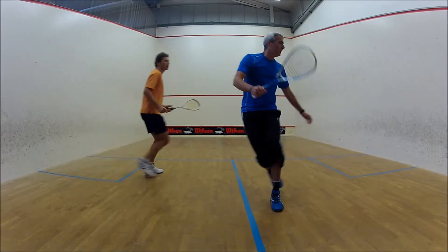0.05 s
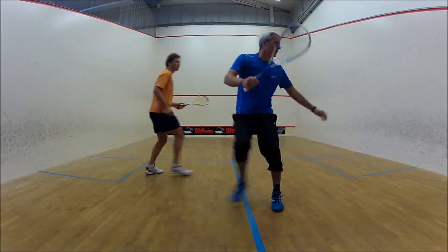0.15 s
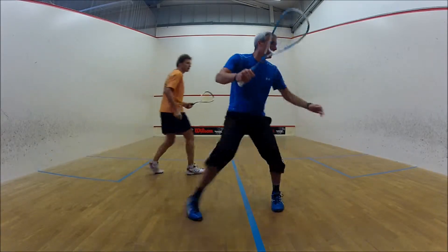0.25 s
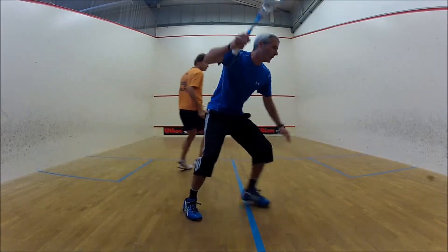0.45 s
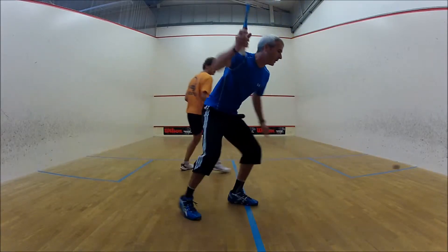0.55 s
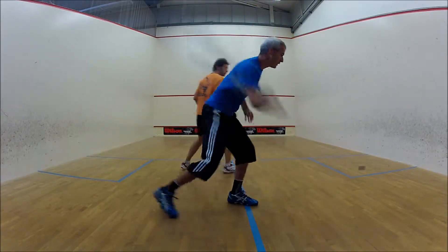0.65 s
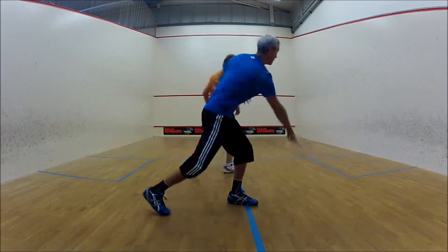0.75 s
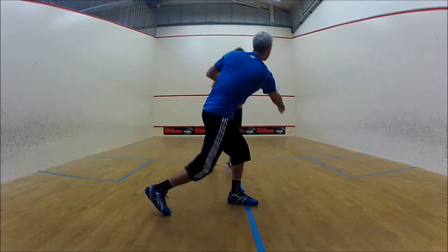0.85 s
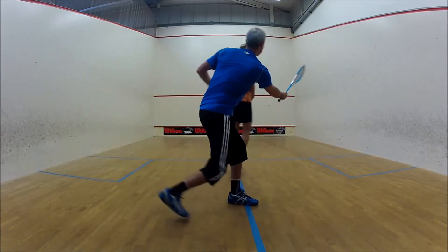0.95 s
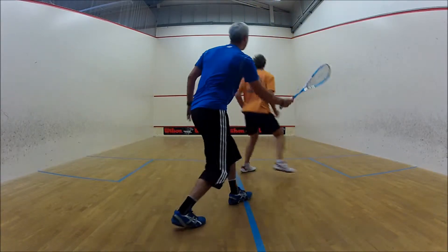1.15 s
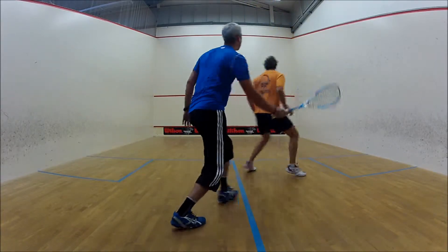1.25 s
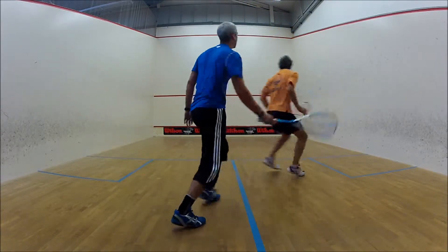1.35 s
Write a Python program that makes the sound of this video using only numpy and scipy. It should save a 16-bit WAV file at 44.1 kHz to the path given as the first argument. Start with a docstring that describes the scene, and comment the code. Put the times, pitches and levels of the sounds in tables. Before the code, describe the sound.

A squash ball slams a glass wall close by at about 0.2 seconds; the pane booms and its fittings rattle until around 0.6. Shoes thud on the wooden floor and squeak briefly near 0.8. At 1.0 a racket cracks the ball, which strikes the far wall, followed by two soft footfalls. The court echoes strongly over a faint hum, and the sound has a slight glassy fizz.

```python
"""A squash rally in an echoing court, heard from the glass back wall.
Over a fading echo and hall hum, shoes scuff, squeak and thud on sprung wood. The ball slams the glass,
which booms and rattles in its fittings; a racket then cracks the ball to the front wall.
A slow converter holds each sample, which adds a glassy fizz."""
import sys
import numpy as np
from scipy import signal
from scipy.fft import rfft, irfft
from scipy.io import wavfile
from scipy.ndimage import uniform_filter1d

SR = 44100
rng = np.random.default_rng(int(sys.argv[2]) if len(sys.argv) > 2 else 0)


def materialize(psi):
    """Save the field psi as 16-bit PCM at rate SR to the path in sys.argv[1].

    A 1-D psi becomes a single channel; in a 2-D psi each row is a channel.
    """
    bounded = np.clip(np.atleast_2d(psi).T, -1, 1)
    quanta = np.round(bounded * 32767).astype(np.int16)
    wavfile.write(sys.argv[1], SR, quanta)


N = 61739


def amp(db):
    """Decibels to gain."""
    return 10 ** (np.asarray(db) / 20)


def unit_rms(x):
    """Scale to rms 1."""
    return x / np.sqrt(np.mean(x ** 2) + 1e-20)


def lookup(points, hz):
    """Interpolate a table on a log-frequency axis."""
    points_hz, values = np.transpose(points)
    return np.interp(np.log(hz + 1), np.log(points_hz + 1), values)


def add(mix, start_s, sound):
    """Mix a sound in at start_s."""
    part = mix[max(round(start_s * SR), 0):][:len(sound)]
    part += sound[:len(part)]


def coloured(x, tone):
    """Zero-phase filter; tone is (frequency [Hz], gain [dB])."""
    gain = amp(lookup(tone, np.fft.rfftfreq(len(x), 1 / SR)))
    return irfft(rfft(x) * gain, len(x))


def noise(tone):
    """Coloured noise, rms 1."""
    return unit_rms(coloured(rng.standard_normal(N), tone))


def decay(t, t60_s):
    """Exponential fall, 60 dB per t60_s."""
    return np.exp(-np.log(1000) * t / t60_s)


def envelope(attack_s, t60_s):
    """Smooth rise, then exponential decay."""
    t = np.arange(N) / SR
    rise = np.sin(np.pi / 2 * np.minimum(t / attack_s, 1)) ** 2
    return rise * decay(np.maximum(t - attack_s, 0), t60_s)


def burst(tone, db, attack_s, t60_s):
    """One impact: noise with its energy set by level and envelope."""
    shape = envelope(attack_s, t60_s)
    sound = noise(tone) * shape
    return amp(db) * sound * np.linalg.norm(shape) / np.linalg.norm(sound)


def bursts(impacts, tone):
    """A series of impacts of one colour."""
    out = np.zeros(N)
    for start_s, db, attack_s, t60_s in impacts:
        add(out, start_s, burst(tone, db, attack_s, t60_s))
    return out


def ring(modes):
    """Sine modes, each swelling and dying at its own rate."""
    t = np.arange(N) / SR
    return sum(amp(db) * envelope(swell_s, t60_s) * np.sin(2 * np.pi * hz * t)
               for hz, db, swell_s, t60_s in modes)


def court_echo(x):
    """Dense echo of hard walls, each band dying at its own rate."""
    # reverberation time (frequency [Hz], t60 [s])
    band_t60 = [(80, 5.6), (160, 1.6), (400, 1.66), (1000, 1.56), (2200, 1.58), (4000, 2.86), (5800, 1.07)]
    delay_s, build_s = 0.0045, 0.0072
    hz, frame_s, bands = signal.stft(rng.standard_normal(N), SR, nperseg=512)
    bands = bands * decay(frame_s, lookup(band_t60, hz)[:, None])
    tail = signal.istft(bands, SR, nperseg=512)[1][:N]
    tail *= np.clip((np.arange(N) / SR - delay_s) / build_s, 0, 1)
    return signal.fftconvolve(x, tail / np.linalg.norm(tail))[:N]


def hall():
    """An earlier stroke's echo fades over the steady hum of the hall."""
    # spectra of the echo and the hum (frequency [Hz], level [dB])
    echo_tone = [(50, -7.5), (105, 19.5), (170, 14), (260, -10.5), (420, 0.5), (700, -14.5), (1100, -3),
                 (1600, -12.5), (2100, -1), (2600, -11), (2950, -5), (4000, -30), (5800, -30)]
    hum_tone = [(25, -37), (60, -10), (150, 9), (260, -13.5), (700, -34), (1200, -31.5), (2200, -16.5),
                (4000, -26), (5800, -33)]
    echo_db, hum_db = -38, -46
    fade = decay(np.arange(N) / SR, t60_s=3.9)
    return amp(echo_db) * fade * noise(echo_tone) + amp(hum_db) * noise(hum_tone)


def shoes():
    """Rubber soles land, then stick and slip in short gliding squeaks."""
    # landings and scuffs (time [s], level [dB], attack [s], t60 [s])
    steps = [(.088, -43.5, 0.0054, 0.12), (.762, -45, 0.015, 0.22), (.804, -29.5, 0.0026, 0.22)]
    # their spectrum and echo send (frequency [Hz], gain [dB])
    step_tone = [(60, -22), (150, -3.5), (290, 5.5), (450, -0.5), (670, -11), (850, -1.5), (1400, -3),
                 (1900, -1), (2350, -4.5), (3200, -2), (4000, -11.5), (5800, -13)]
    send_tone = [(100, -8), (280, -7), (420, 7.5), (650, 0.5), (850, 5), (1400, 0), (1700, -4), (2050, 6),
                 (2550, -4.5), (2900, 1.5), (3300, -8), (4000, -3), (5800, 0)]
    # sole squeaks (time [s], length [s], mid pitch [Hz], glide [octaves], level [dB], echo send [dB])
    squeaks = [(.0705, .006, 1840, -1.04, -32.5, -11), (.562, .025, 3770, .03, -49, -3),
               (.805, 0.0075, 1490, -0.26, -29, -18), (.814, .013, 4000, .2, -37, -13),
               (0.89, 0.046, 1170, -0.14, -41.5, 5.5), (0.81, 0.026, 1135, -0.14, -28, -3),
               (.825, 0.026, 890, -0.3, -37.5, -6), (.83, 0.061, 2280, -0.13, -43, -3.5),
               (1.319, .03, 5300, -0.23, -52, 8), (1.298, 0.054, 1070, -0.03, -38.5, -12)]
    jitter_rms_hz = 35
    direct = bursts(steps, step_tone)
    send = coloured(direct, send_tone)
    for start_s, length_s, pitch_hz, glide_oct, db, send_db in squeaks:
        progress = np.arange(0, 1, 1 / (length_s * SR))
        waver = unit_rms(uniform_filter1d(rng.standard_normal(N), size=90))[:len(progress)]
        hz = pitch_hz * 2 ** (glide_oct * (progress - .5)) + jitter_rms_hz * waver
        squeak = amp(db) * np.sin(np.pi * progress) * np.sin(2 * np.pi * np.cumsum(hz) / SR)
        add(direct, start_s, squeak)
        add(send, start_s, amp(send_db) * squeak)
    return direct + court_echo(send)


def sprung_floor():
    """Soft footfalls make the boards boom."""
    # footfalls (time [s], gain [dB])
    footfalls = [(0.101, -2.5), (0.641, 0.5), (1.18, 2.5), (1.358, -2.5)]
    # floor modes (frequency [Hz], level [dB], swell [s], t60 [s])
    floor_modes = [(65.7, -45, 0.055, 0.3), (158, -27, 0.04, 0.22), (185.9, -39, 0.033, 0.34)]
    echo_db = -18
    direct = np.zeros(N)
    for start_s, db in footfalls:
        add(direct, start_s, amp(db) * ring(floor_modes))
    return direct + amp(echo_db) * court_echo(direct)


def glass_wall():
    """The ball slaps the pane, which booms and knocks against its frame."""
    # ball slaps and frame knocks (time [s], level [dB], attack [s], t60 [s])
    slaps = [(0.2175, -30, 0.0054, 0.15), (0.2235, -19, 0.0022, .25)]
    knocks = [(.327, -23, 0.0017, 0.24), (.393, -23.5, 0.0074, 0.22), (.418, -23.5, 0.0035, 0.1),
              (.459, -34, 0.0046, 0.3)]
    # their spectra and the wall's echo send (frequency [Hz], gain [dB])
    slap_tone = [(60, -28.5), (150, 4.5), (450, 3.5), (720, -6.5), (1100, 3.5), (1500, -11.5), (2000, 3.5),
                 (2500, -10), (2850, -12), (3600, -10), (4300, -32), (5800, -38)]
    knock_tone = [(30, 2.5), (85, -3.5), (200, 1), (300, -8.5), (370, -1.5), (450, 0.5), (540, -29.5),
                  (1100, -25.5), (2500, -26), (5800, -47.5)]
    send_tone = [(150, -16), (260, -12), (400, -24.5), (700, -15), (1200, -15), (2000, -34), (5000, -14)]
    # pane modes (frequency [Hz], level [dB], swell [s], t60 [s])
    pane_modes = [(96.3, -35, 0.026, 1), (129.6, -11.5, 0.014, 0.46), (152.73, -11, 0.17, 0.25),
                  (178.2, -12, 0.012, 0.43), (193.26, -6, 0.0054, 0.44), (272, -28, 0.0033, 0.57),
                  (377, -21, 0.044, 0.22), (412.7, -12, 0.014, .24), (441, -31.5, 0.0067, 0.97),
                  (501, -29, 0.0031, 0.26), (607, -28, 0.012, 0.21), (644, -36.5, 0.0036, 0.35),
                  (853, -34, 0.0026, 0.37), (1031, -42, 0.0088, 0.27), (1255, -27, 0.0058, 0.35),
                  (1932, -49, 0.0028, 0.45), (2050, -33, .003, 0.15)]
    boom_s = .2335
    direct = bursts(slaps, slap_tone) + bursts(knocks, knock_tone)
    add(direct, boom_s, ring(pane_modes))
    return direct + court_echo(coloured(direct, send_tone))


def fittings():
    """Loose fittings tick while the pane shakes, each tick slightly detuned."""
    # rattle ticks (time [s], gain [dB])
    ticks = [(.2395, -16), (.2438, -16), (.2503, -13), (.258, -13), (.2655, -15), (.273, -18), (.2845, -24),
             (.288, -22), (.2925, -19), (.299, -18), (.3115, -28), (.3265, -23), (.3315, -19), (.344, -23),
             (.348, -25), (.352, -29), (.358, -22), (.3905, -24), (.3975, -24), (.403, -21), (.418, -23),
             (.434, -24), (.4585, -29.5), (.470, -37), (.508, -31), (.555, -39), (.642, -37)]
    # fitting modes (frequency [Hz], level [dB])
    fitting_modes = [(1250, -12), (1650, -9), (1980, -3.5), (2250, -12), (2900, -12), (3650, -16.5),
                     (4900, -27)]
    detune_rms, echo_db = 0.019, -18
    mode_hz, mode_db = np.transpose(fitting_modes)
    t = np.arange(SR // 20) / SR
    shape = envelope(attack_s=0.0014, t60_s=0.011)[:len(t)]
    direct = np.zeros(N)
    for start_s, db in ticks:
        hz = mode_hz * (1 + detune_rms * rng.standard_normal(len(mode_hz)))
        cycles = np.outer(t, hz) + rng.random(len(hz))
        ringing = np.sin(2 * np.pi * cycles) @ amp(mode_db)
        add(direct, start_s, amp(db) * shape * ringing)
    return direct + amp(echo_db) * court_echo(direct)


def racket_stroke():
    """The racket cracks and rings briefly; a hollow boom follows and both fill the court."""
    # crack, first echoes, ball on the front wall
    # (time [s], level [dB], attack [s], t60 [s], echo send [dB])
    cracks = [(1.0245, -17.5, .0012, .05, 2), (1.028, -18, .001, .04, 2), (1.040, -25, .002, .07, 0),
              (1.083, -31, .002, .1, -8), (1.118, -31, .001, .04, -7), (1.140, -26, .003, .05, -3)]
    # spectra of a crack and its echo send (frequency [Hz], level [dB])
    crack_tone = [(150, -10), (400, -4), (650, -22), (1250, -24), (1500, -4), (1750, -15), (1950, 3),
                  (2230, 5), (2560, -15), (2800, 2), (3050, 5), (3350, -13), (3700, -7), (4250, -24),
                  (4700, -14), (5250, -13), (5800, -27)]
    send_tone = [(100, 3.5), (240, -5), (290, -6.5), (370, 5), (440, 6), (520, -5.5), (600, -0.5),
                 (700, -16.5), (880, 5), (960, -1), (1060, -1), (1350, -1.5), (1750, -5.5), (2000, 4.5),
                 (2250, 6), (2550, -6.5), (2930, 3), (3300, -11.5), (4200, -18), (5200, -15), (5800, -15.5)]
    # modes of frame and strings, and of the boom (frequency [Hz], level [dB], swell [s], t60 [s])
    racket_modes = [(1922, -25, 0.0027, 0.12), (2215, -27.5, 0.00099, 0.073), (3170, -26, 0.00088, 0.035)]
    boom_modes = [(97.7, -30.5, 0.028, 0.5), (158.6, -23, 0.03, 0.3), (194.7, -12.5, 0.0044, 0.22)]
    hit_s, boom_s, boom_send_db = cracks[0][0], 1.042, -13
    direct, send, boom = np.zeros((3, N))
    for start_s, db, attack_s, t60_s, send_db in cracks:
        add(direct, start_s, burst(crack_tone, db, attack_s, t60_s))
        add(send, start_s, burst(send_tone, db + send_db, attack_s, t60_s))
    add(direct, hit_s, ring(racket_modes))
    add(boom, boom_s, ring(boom_modes))
    return direct + boom + court_echo(send + amp(boom_send_db) * boom)


def scene():
    """All sources at one microphone."""
    return (hall() + shoes() + sprung_floor() + glass_wall() + fittings() + racket_stroke())[None]


def record(dry):
    """Bass roll-off, soft clip, slow sample-and-hold that mirrors the sound into the treble, low-pass."""
    # microphone response (frequency [Hz], gain [dB])
    mic_tone = [(20, -23), (32, -11.5), (50, -1), (90, 0), (5800, -1)]
    full_scale, knee = .92, 8
    converter_hz, hold_repeats = 12000, 4
    anti_alias_hz, band_limit_hz = 5930, 15400
    x = coloured(dry[0], mic_tone)
    clipped = x / (1 + abs(x / full_scale) ** knee) ** (1 / knee)
    slow = signal.resample_poly(clipped, converter_hz, SR)
    slow = signal.oaconvolve(slow, signal.firwin(61, anti_alias_hz, fs=converter_hz), "same")
    held = signal.resample_poly(np.repeat(slow, hold_repeats), SR, converter_hz * hold_repeats)[:N]
    low_pass = signal.firwin(255, band_limit_hz, window=("kaiser", 8), fs=SR)
    return signal.oaconvolve(held, low_pass, "same")[None]


dry = scene()
out = record(dry)
materialize(out)
```